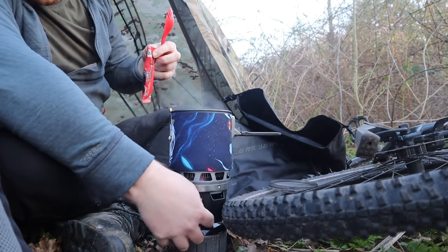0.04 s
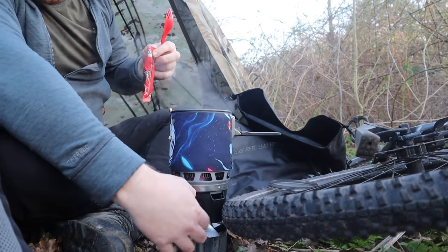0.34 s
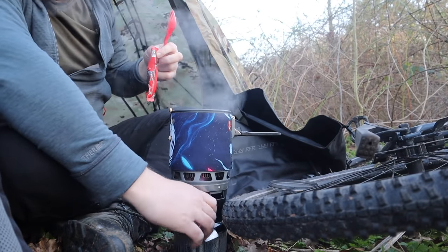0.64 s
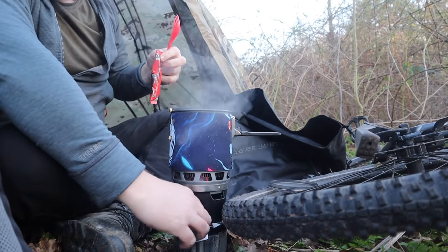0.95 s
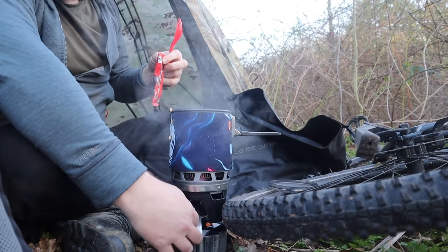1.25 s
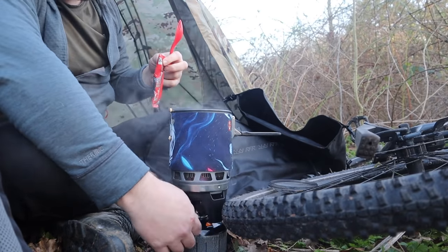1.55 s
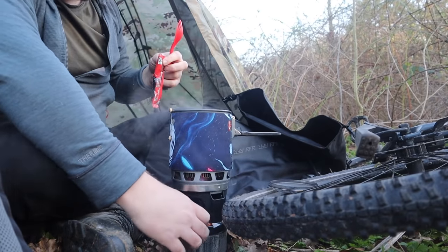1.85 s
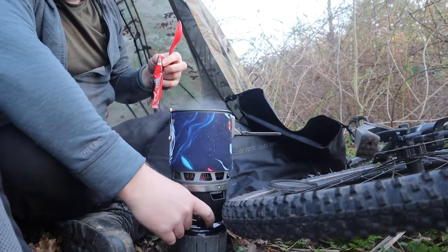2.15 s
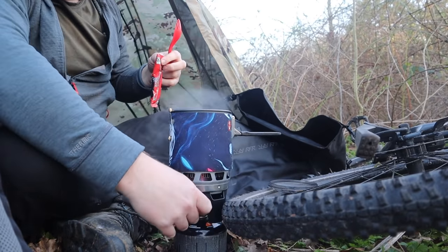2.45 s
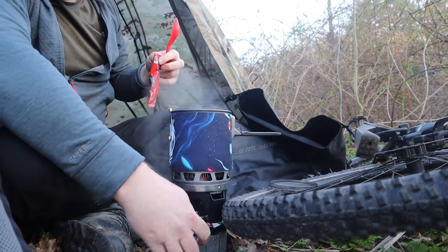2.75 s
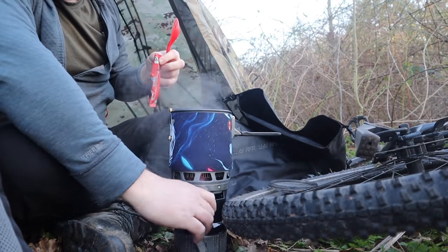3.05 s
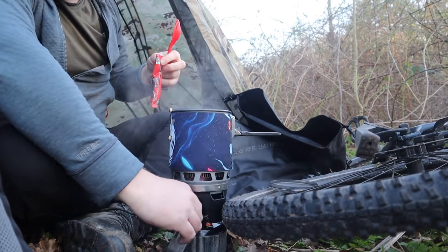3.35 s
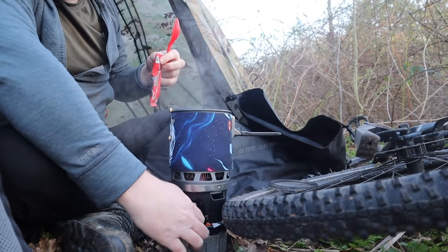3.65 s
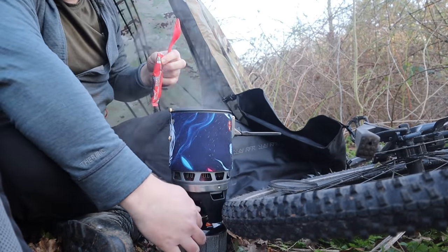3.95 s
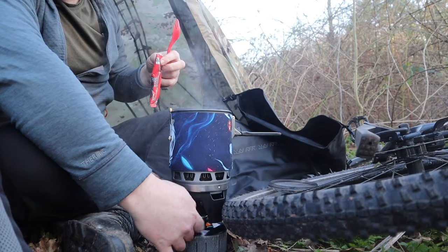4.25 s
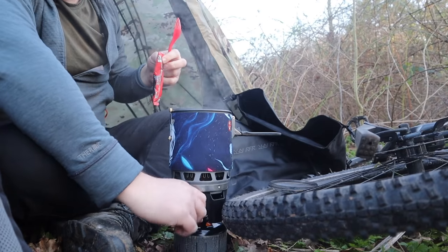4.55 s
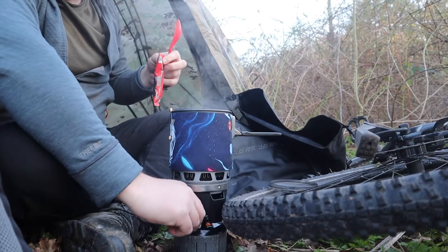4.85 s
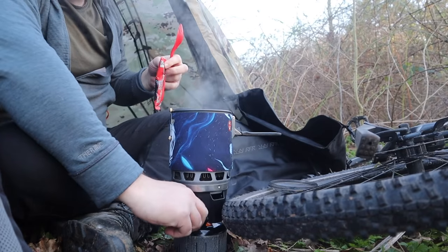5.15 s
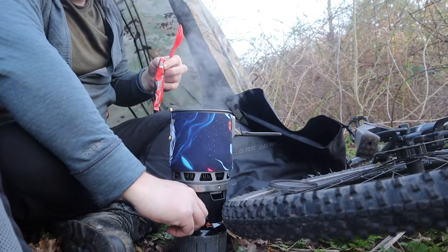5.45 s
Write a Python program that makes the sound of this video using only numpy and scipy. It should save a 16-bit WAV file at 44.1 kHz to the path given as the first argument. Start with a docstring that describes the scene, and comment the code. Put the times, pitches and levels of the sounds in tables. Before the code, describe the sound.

A gas camping stove burns close by from the start, a loud, steady flame roar with a high hiss, outdoors with no echo. Water fizzes very faintly in the pot, and a busy road rumbles behind. Between about 0.3 and 0.6 seconds the stove's wire valve handle gives a quick cluster of bright metal clinks and a sharp scrape. Small dry ticks follow around 1.4, 2.1 and 2.5 seconds, a clearer clink comes at 2.9, and softer ones near 3.4. The roar brightens slightly around 2.5 seconds. Just after 4 seconds the gas is shut off and the roar and hiss stop abruptly. The fizz fades over the next second or so. The quieter rumble and tyre rush of traffic remain, with a car swelling slightly around 4.3 seconds, a faint tick at 5.1, and a low engine drone growing until the end, near 5.7 seconds.

```python
"""Beside a busy road, a gas camping stove burns under a pot of fizzing water.
Turbulence makes the flame roar and the gas jet hiss, both coloured by cavity resonances.
A hand gropes for the valve's folding wire handle, which clinks in its bending modes and scrapes
in its seat. After four seconds the gas is shut off and the fizz of steam bubbles fades;
the rumble of traffic, the rush of tyres and the drone of an approaching engine remain."""
import sys
import numpy as np
from scipy import signal
from scipy.fft import rfft, irfft, next_fast_len
from scipy.io import wavfile
from scipy.ndimage import map_coordinates

SR = 44100
rng = np.random.default_rng(int(sys.argv[2]) if len(sys.argv) > 2 else 0)


def generate_wav(signal):
    """Clip the signal to [-1, 1] and save it as 16-bit WAV at the path in sys.argv[1]."""
    frames = np.transpose(np.atleast_2d(signal))
    scaled = np.clip(frames, -1, 1) * 32767
    pcm = np.round(scaled).astype(np.int16)
    wavfile.write(sys.argv[1], SR, pcm)


N = 251349
TIME = np.arange(N) / SR
FFT_SIZE = next_fast_len(N, True)
HZ = np.fft.rfftfreq(FFT_SIZE, 1 / SR)
SHUT_S = 4.07  # the valve is fully closed


# Spectrum of the flame in the pot's windscreen: (frequency [Hz], relative density [dB])
FLAME_SPECTRUM = [(40, -31), (100, -10.5), (200, -5), (450, -2.5), (850, -3.5), (1900, 0.5), (2250, -12),
                  (3100, -24), (5000, -55)]
# Strength of the flame with the valve open: (time [s], level [dB])
FLAME_LEVELS = [(0, -18), (1.1, -19), (2.55, -18), (3.5, -19.5), (4, -19)]
# Spectrum of the gas jet in the burner tube: (frequency [Hz], relative density [dB])
JET_SPECTRUM = [(1500, -14), (3100, 2), (4700, 1.5), (7200, -5.5), (9450, -4), (9850, -11.5), (10800, -22),
                (11600, -8), (14800, -12.5), (15700, -23)]
# Air resonances of windscreen and burner tube: (frequency [Hz], width [Hz], gain [dB])
AIR_RESONANCES = [(667, 255, 4), (1061, 320, 6), (1650, 92, 2.7), (2667, 424, 7), (5214, 440, 8),
                  (6440, 500, 14), (8130, 680, 6.5), (12400, 568, 1)]

def burner(jet_db=-35.5, sag_db_per_s=0.65, twist_s=0.075, pitch_lift=0.062):
    """Turbulent noise: flame and jet excite the same cavities and die together as the valve shuts."""
    flow = np.sin(np.pi / 2 * np.clip((SHUT_S - TIME) / twist_s, 0, 1)) ** 1.34
    cavities_db = resonance_db(AIR_RESONANCES)
    flame = noise(spectrum(FLAME_SPECTRUM) + cavities_db)
    flame_db = np.interp(TIME, *np.transpose(FLAME_LEVELS))
    flame *= gain_of(flame_db + 0.5 * wander(rate_hz=30))
    jet = noise(spectrum(JET_SPECTRUM) + cavities_db)
    jet *= gain_of(jet_db - sag_db_per_s * TIME + 0.8 * wander(rate_hz=77))
    # Air replaces the heavy gas and lifts the jet's pitch.
    positions = np.arange(N) + np.cumsum(pitch_lift * (1 - flow))
    jet = map_coordinates(jet, [positions], order=3)
    return flow * flame + np.sqrt(flow) * jet


# Modes of the wire handle:
# (frequency [Hz], relative level [dB], T60 [s], bending plane [about -1 upright to 1 sideways])
HANDLE_MODES = [(3300, -8.5, 0.085, 1), (3639, -3.5, 0.13, -0.048), (4506, -8, 0.12, -1.1),
                (4904, -9.5, 0.26, -0.86), (5157, -2, 0.061, 0.79), (5920, -10, .09, 1),
                (6230, -11.5, 0.12, 1), (6767, -5, .1, -0.92), (7780, 3, 0.07, 0.096),
                (10050, -4, 0.053, -1.1), (10110, -1.5, 0.067, -0.085), (11900, -7, 0.054, 0.94),
                (12560, -10.5, 0.077, -0.05), (13650, 0, .05, -0.36), (14700, -14, .035, .4)]
# Knocks on the handle: (time [s], base level [dB], brightness [dB/octave], sideways lean [dB],
# mode favoured by the spot struck [Hz])
KNOCKS = [(.2895, -21.5, -6, 7.5, 11900), (.3167, -19.5, 1, -2, 6767), (.3335, -24.5, -.5, 3.5, 5157),
          (.3435, -25.5, 3, -8, 12560), (.3751, -31, -1.5, 2, 11900), (.4041, -31.5, -5, -6, 3639),
          (.4468, -24.5, 3, -6, 3639), (.4505, -19.5, 3, -4, 4506), (.4572, -30, -4, -5, 3639),
          (1.4272, -51, -10, 10, 3639), (1.4657, -54, -9, 10, 3639), (2.9287, -19.5, 2, 6.5, 3639),
          (2.9362, -25, -1, -4, 3639), (3.3693, -29.5, -8, 2, 3639), (3.4182, -32.5, -1.5, 10, 5157)]

def handle(firm_db=-18.5, grip_s=0.011):
    """Modal vibration: a knock clicks and rings the modes that bend its way, until contact damps them."""
    out, t = np.zeros(N), np.arange(SR // 4) / SR
    hz, mode_db, t60, plane = np.transpose(HANDLE_MODES)[:, :, None]
    phases = rng.random((len(KNOCKS), len(HANDLE_MODES), 1))
    for (s, db, brightness, sideways_db, spot_hz), phase in zip(KNOCKS, phases):
        # The lighter the touch, the more one mode stands out and the less it clicks.
        lightness_db = firm_db - db
        favoured = abs(hz - spot_hz) == abs(hz - spot_hz).min()
        spot_db = (7 + 0.6681 * lightness_db) * favoured
        start_db = db + mode_db + brightness * np.log2(hz / hz[0]) + sideways_db * plane + spot_db
        modes = gain_of(start_db - 60 * t / t60) * np.sin(2 * np.pi * (hz * t + phase))
        # Sideways blows come from the fingers, which catch the wire sooner.
        free_s = 0.036 / 2 ** (sideways_db / 7.5)
        damping = np.exp(-np.maximum(t - free_s, 0) / grip_s)
        add(out, s, modes.sum(0) * damping)
        click_hz = 7160 * 2 ** (brightness / 2.5)
        click = body_tick(rise_s=0.0004, decay_s=0.0042, centre_hz=click_hz, octaves=1.1, steepness=1.1)
        add(out, s, gain_of(-8 - 2.3 * lightness_db) * click)
    return out


# Slips of the handle: (time [s], level [dB], length [s], centre [Hz], bandwidth [octaves])
SLIPS = [(0.518, -20, 0.019, 8000, 1.1), (.533, -7, 0.0068, 3700, 4.1), (0.554, -25, .005, 4000, 2),
         (0.922, -33, .012, 9500, 2), (1.4268, -25, 0.0036, 3300, 2.1), (2.0655, -24, .004, 3200, 1.3),
         (2.1425, -20.5, 0.0024, 3300, 1.1), (2.5105, -18.5, 0.003, 5800, 3.5),
         (5.119, -34, 0.013, 7400, .45)]

def scrapes(rise_share=0.33):
    """Sliding friction: the handle slips in its seat in short, dry strokes."""
    out = np.zeros(N)
    for s, db, length_s, centre_hz, octaves in SLIPS:
        rise_s = rise_share * length_s
        stroke = body_tick(rise_s, length_s - rise_s, centre_hz, octaves, steepness=2.2)
        add(out, s, gain_of(db) * stroke)
    return out


# Resonances of the stove's body: (frequency [Hz], width [Hz], gain [dB])
BODY_RESONANCES = [(3540, 300, 2), (4130, 790, 11), (4700, 220, 7), (4870, 160, 9.5), (7320, 430, 13),
                   (7920, 550, 9), (8900, 550, 7), (10200, 500, 3), (13500, 900, 4)]

def body_tick(rise_s, decay_s, centre_hz, octaves, steepness, cutoff_hz=1800):
    """Forced vibration: a brief rub of metal drives the stove's body, too small to radiate bass."""
    t, hz = np.arange(4096) / SR, np.fft.rfftfreq(4096, 1 / SR)
    body_db = resonance_db(BODY_RESONANCES, hz) - 10 * np.log10(1 + (cutoff_hz / (hz + 1)) ** 10)
    colour = gain_of(body_db + steepness * band_db(centre_hz, octaves, hz))
    envelope = np.minimum(t / rise_s, 1) ** 2 * np.exp(-np.maximum(t - rise_s, 0) / decay_s)
    friction = rng.standard_normal(len(t))
    return envelope * unit_rms(irfft(rfft(friction) * colour))


# Soft swells of hiss: (time [s], length [s], level [dB], centre [Hz])
SWELLS = [(0, 0.65, -36, 2490), (1.098, 0.89, -42, 4860), (2.251, 0.42, -32, 2350), (3.805, 0.3, -47, 4400),
          (5.333, .2, -52, 4150)]

def hiss_swells(octaves=0.41):
    """Band-limited noise: the flame's roar brightens near 2.4 kHz; a sleeve rustles at 4-5 kHz."""
    out = np.zeros(N)
    for s, length_s, db, centre_hz in SWELLS:
        swell = np.hanning(round(length_s * SR))
        hiss = noise(2 * band_db(centre_hz, octaves))[:len(swell)]
        add(out, s, gain_of(db) * swell * hiss)
    return out


# Spectrum of the water's fizz: (frequency [Hz], relative density [dB])
FIZZ_SPECTRUM = [(4000, -25), (6500, -19), (8000, 2), (9500, -7.5), (10600, -9), (11500, 0), (12300, 3),
                 (13300, -13), (15500, -14)]

def simmer(pops_per_s=14000, fizz_db=-50, lag_s=0.15, cooling_db_per_s=7.5):
    """Shot noise: tiny steam bubbles collapse on the pot's hot floor, fading once the flame is out."""
    level_db = fizz_db - cooling_db_per_s * np.maximum(TIME - SHUT_S - lag_s, 0)
    pops = rng.standard_normal(N) * (rng.random(N) < pops_per_s / SR)
    return gain_of(level_db) * coloured(pops, spectrum(FIZZ_SPECTRUM))


# Spectra of the road's rumble and of its tyres: (frequency [Hz], relative density [dB])
RUMBLE_SPECTRUM = [(22, -30), (43, -16), (64, -3.5), (100, -2.5), (160, 0), (240, 2.5), (320, -4.5),
                   (420, -8), (560, -18.5), (1000, -43.5)]
TYRE_SPECTRUM = [(300, -23), (630, -12), (790, -4), (1050, -0.6), (1500, -1.7), (2000, -8.5), (2800, -19),
                 (4000, -24.5), (4800, -31.5), (7000, -32), (10000, -43.5), (15300, -55)]

def traffic(rumble_db=-30, tyre_db=-28.5, car_s=4.33):
    """Superposition: one car swells over steady road noise and leaves a lull in the rumble behind it."""
    car = nearness(car_s, pass_s=0.28) ** 2
    lull = (1 - car) * (TIME > car_s)
    rumble = noise(spectrum(RUMBLE_SPECTRUM)) * gain_of(rumble_db + 2.6 * car - 1.1 * lull)
    tyres = noise(spectrum(TYRE_SPECTRUM)) * gain_of(tyre_db + 0.5 * car)
    return rumble + tyres


def engine(firing_hz=69.7, waver=0.0084, closest_db=-37.5, throb_db=0.5):
    """Periodic excitation: the firing of a heavy engine gives a wavering tone that grows as it nears."""
    cycles = np.cumsum(firing_hz * (1 + waver * wander(rate_hz=5))) / SR
    tone = unit_rms(np.sin(2 * np.pi * cycles))
    level_db = closest_db + throb_db * wander(rate_hz=6)
    return tone * gain_of(level_db) * nearness(closest_s=5.73, pass_s=0.65)


def nearness(closest_s, pass_s):
    """Inverse-distance law: amplitude of a vehicle on a straight road, 1 at its closest."""
    return 1 / np.hypot(1, (TIME - closest_s) / pass_s)


def gain_of(db):
    """Amplitude ratio of a level in decibels."""
    return 10 ** (np.asarray(db) / 20)


def unit_rms(x):
    """Normalisation to rms 1."""
    return x / np.sqrt(np.mean(x ** 2) + 1e-20)


def spectrum(points):
    """Interpolation of (frequency [Hz], level [dB]) points on a log-frequency axis."""
    hz, db = np.transpose(points)
    return np.interp(np.log(HZ + 1), np.log(hz), db)


def resonance_db(resonances, at_hz=HZ):
    """Resonant gain in dB, one bell-shaped peak per resonance."""
    return sum(db * np.exp(-(2 * (at_hz - hz) / width) ** 2) for hz, width, db in resonances)


def band_db(centre_hz, octaves, at_hz=HZ):
    """Band-pass response in dB, `octaves` wide at half power."""
    return -10 * np.log10(1 + (2 * np.log2((at_hz + 1) / centre_hz) / octaves) ** 2)


def coloured(x, colour_db):
    """Linear filtering by a response in dB, scaled to rms 1."""
    return unit_rms(irfft(rfft(x, FFT_SIZE) * gain_of(colour_db), FFT_SIZE)[:N])


def noise(colour_db):
    """Gaussian noise of rms 1 with the given spectral shape."""
    return coloured(rng.standard_normal(N), colour_db)


def wander(rate_hz):
    """Random modulation: low-pass noise of rms 1."""
    return noise(-10 * np.log10(1 + (HZ / rate_hz) ** 6))


def smoothed(x, time_s):
    """First-order lag with the given time constant."""
    pole = np.exp(-1 / (time_s * SR))
    return signal.lfilter([1 - pole], [1, -pole], x)


def add(mix, s, sound):
    """Superposition of a sound on the mix from time s."""
    part = mix[round(s * SR):][:len(sound)]
    part += sound[:len(part)]


def scene():
    """Free field: the nearby stove and hand and the road behind them sum without reverberation."""
    return (burner() + handle() + scrapes() + hiss_swells() + simmer() + traffic() + engine())[None]


def record(dry, threshold_db=-14, squeeze=0.44, recover_db_per_s=9, edge_hz=15850):
    """Compression: the gain ducks briefly after the loudest knocks; clipping and a band limit follow."""
    power = smoothed(dry[0] ** 2, time_s=0.0055)
    over_db = np.maximum(10 * np.log10(power + 1e-12) - threshold_db, 0)
    recovery_db = recover_db_per_s * TIME
    held_db = np.maximum.accumulate(over_db + recovery_db) - recovery_db
    ducked = dry * gain_of(-smoothed(squeeze * held_db, time_s=0.033))
    lowpass = signal.firwin(301, edge_hz, window=("kaiser", 8), fs=SR)
    return signal.oaconvolve(np.clip(ducked, -1, 1), lowpass[None], "same")


dry = scene()
out = record(dry)
generate_wav(out)
```